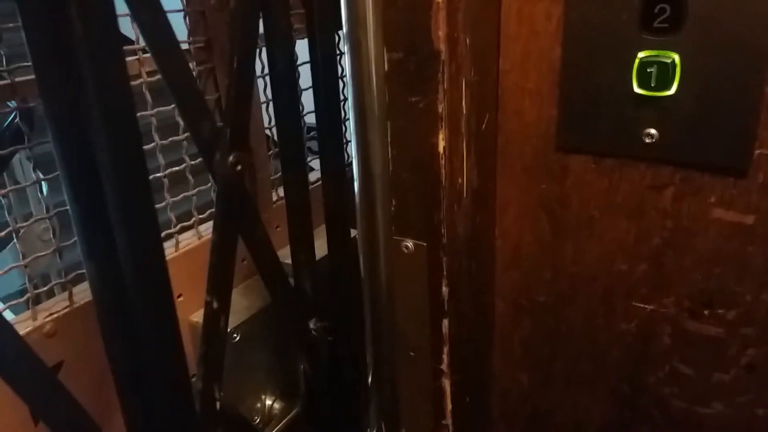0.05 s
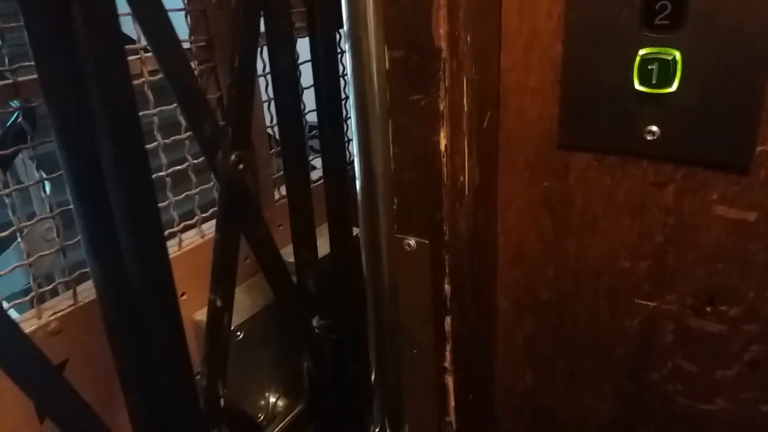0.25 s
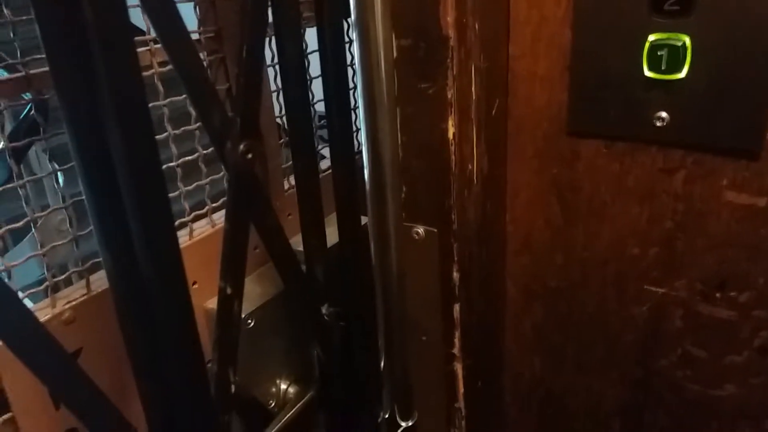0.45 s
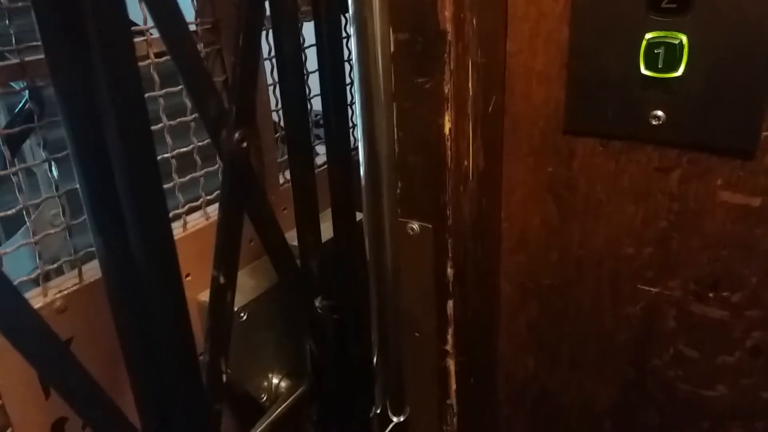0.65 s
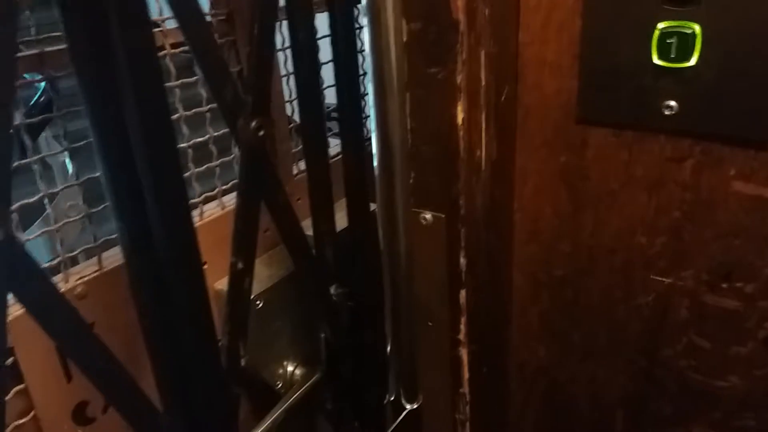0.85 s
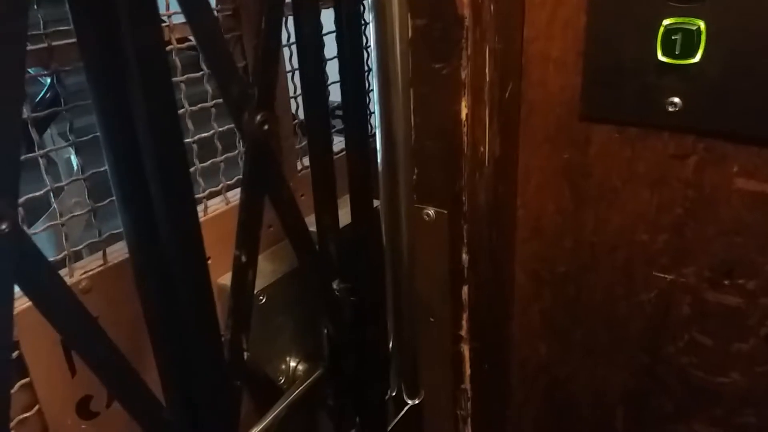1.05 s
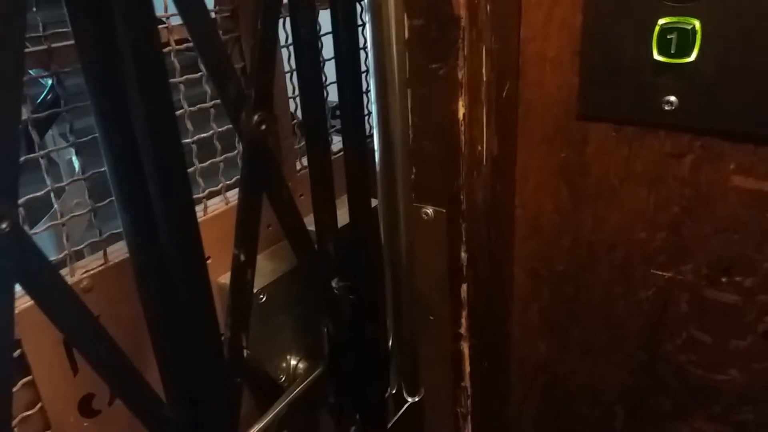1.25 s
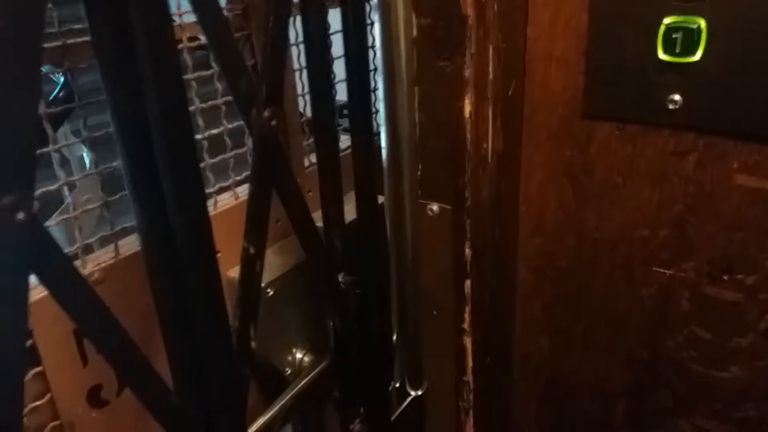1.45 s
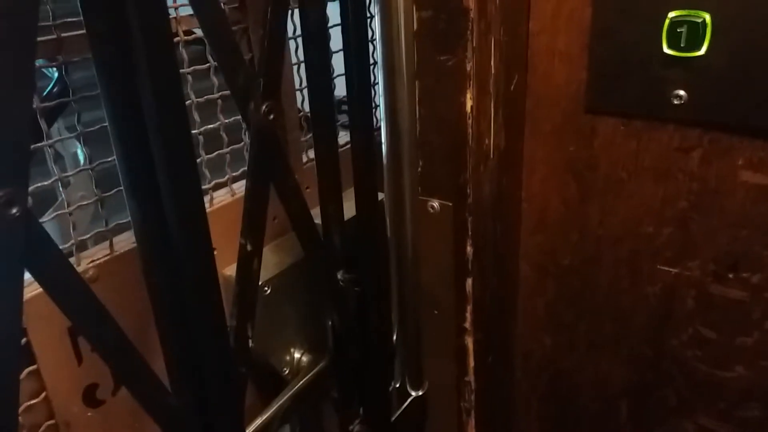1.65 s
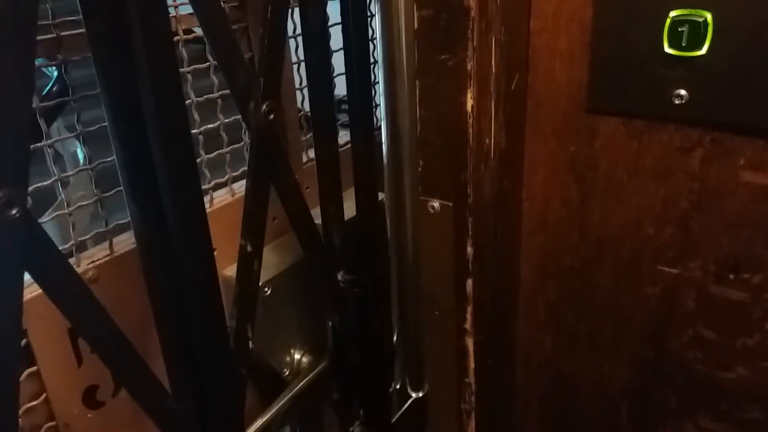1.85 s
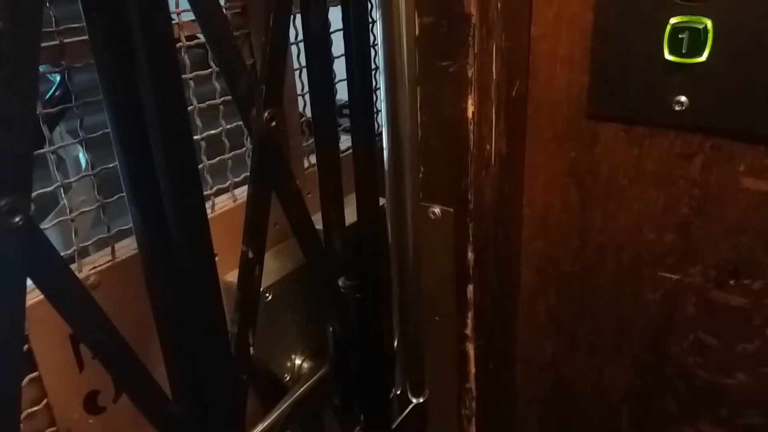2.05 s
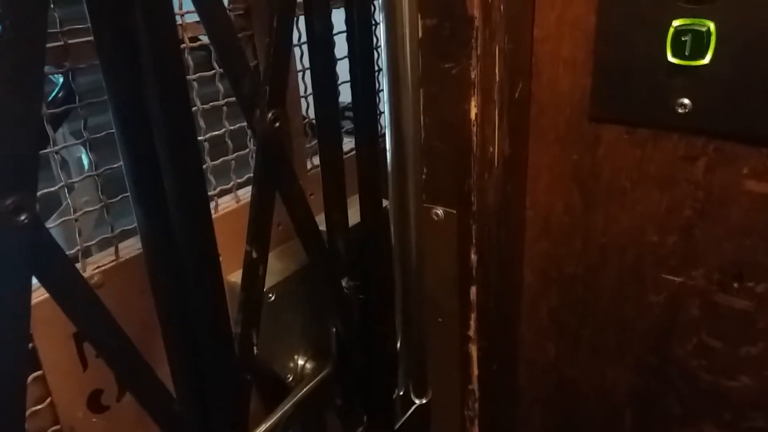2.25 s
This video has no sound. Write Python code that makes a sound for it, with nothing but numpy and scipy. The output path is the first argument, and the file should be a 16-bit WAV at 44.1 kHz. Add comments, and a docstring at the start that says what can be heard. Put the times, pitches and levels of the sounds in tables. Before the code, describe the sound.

A folding metal lift gate latches with a sharp clank that rings through the shaft.

```python
"""An old lift's folding steel gate latches, heard from inside the wooden car over a low, steady rumble.
The lever slides and knocks lightly, then at a quarter second the latch slams home: steel rings and
the gate bars clatter. The blow shakes the car's floor and panels, which shudder again a moment later.
The shaft rings on for about a second with a faint hiss behind it, and the settling gate ticks twice.
Two soft thuds in the car come near the end."""
import sys
import numpy as np
from scipy import signal
from scipy.fft import rfft, irfft
from scipy.io import wavfile

SR = 44100
rng = np.random.default_rng(int(sys.argv[2]) if len(sys.argv) > 2 else 0)


def unload_wav(signal):
    """Save mono or channel-first audio to the path in sys.argv[1] as 16-bit WAV at rate SR, clipped to [-1, 1]."""
    wavfile.write(
        sys.argv[1],
        SR,
        np.round(np.clip(np.atleast_2d(signal).T, -1, 1) * 32767).astype(np.int16),
    )


N = 105840  # 2.4 s


def latch():
    """Steel contacts feed energy into the latch's modes and the gate bars; slow contacts sound duller."""
    # the slam and its rattle: start_s, level_db, contact_s
    contacts = [(.2395, -38.5, 0.00094), (0.2435, -32.5, 0.0013), (0.2452, -27, 0.00057),
                (0.2486, -36, 0.0021), (0.2565, -47.5, 0.0038), (.277, -39.5, .005), (0.329, -38, 0.0068)]
    # ring of the latch: pitch_hz, level_db, t60_s
    latch_modes = [(500, -18, .18), (557, -12, .18), (630, -11, .2), (755, -14, .2), (860, -16, .18),
                   (1365, -4, .14), (1573, -13, .13), (1788, -15, .12), (1981, -15, .1), (2242, -3, .13),
                   (2385, -12, .1), (3458, -11, .08), (4330, -14, .05), (4980, -11, .06), (5425, -4, .07)]
    # dense clatter of the gate bars: freq_hz, density_db, t60_s
    clatter = [(60, -45, .15), (200, -11, .15), (430, -1, 0.2), (613, 4, 0.17), (740, 0, 0.069),
               (1070, -11.5, 0.084), (1470, -5.5, 0.096), (2680, -7, 0.15), (5750, -7, 0.088),
               (5970, -16, 0.059), (6900, -12.5, 0.12), (7860, -22.5, 0.097), (15800, -23.5, 0.024)]
    steel_db, bars_db = -4, -0.5
    contact_cycles = 19  # vibrations that fit more cycles than this into a contact get less energy
    t = np.arange(N) / SR
    contact_s = np.array(contacts)[:, 2]
    pushes = np.array([amp(db) ** 2 * at(start, np.diff(rise(length), prepend=0))
                       for start, db, length in contacts])

    def power(hz):
        """Power that all the contacts deliver at one frequency."""
        return 1 / (1 + (hz * contact_s / contact_cycles) ** 2) @ pushes

    steel = sum(amp(db) * np.sin(2 * np.pi * (hz * t + rng.random())) * ring_envelope(power(hz), t60)
                for hz, db, t60 in latch_modes)
    bars = sum(band * ring_envelope(power(hz), along(clatter, hz, column=2))
               for hz, band in bands(noise(clatter)))
    return amp(steel_db) * steel + amp(bars_db) * bars


def car_thuds():
    """Soft blows sway the car and build up in its floor, walls and wooden panels."""
    # blows that shake the car: start_s, sway_db, floor_db, wall_db, panel_db, build_s
    thuds = [(0.087, -54, -37, -71, -67, 0.028), (0.184, -74, -42.5, -43, -41, 0.0038),
             (0.215, -71, -33, -67, -48, 0.008), (.243, -31, -68, -35.5, -33, 0.0088),
             (.259, -40, -16.5, -36, -25, 0.015), (0.312, -28.5, -45, -58, -57, 0.022),
             (0.366, -38, -27.5, -39.5, -41.5, 0.022), (0.427, -39, -35, -39, -59, 0.027),
             (0.514, -49, -31, -45, -58, 0.021), (0.547, -50, -59, -50, -40.5, 0.017),
             (.572, -34.5, -51, -54, -56, 0.0049), (0.621, -42, -32.5, -41.5, -36.5, .018),
             (.665, -81, -50, -30.5, -41, 0.025), (0.714, -46, -34.5, -53, -45, 0.018),
             (0.772, -47, -34, -52.5, -54.5, .018), (0.862, -77, -45, -57, -69, 0.01),
             (2, -53.5, -57, -67, -63, 0.0078), (2.145, -55, -55, -58.5, -75, 0.0079)]
    # modes of the swaying car, its floor, its walls and its thin panels: pitch_hz, level_db, t60_s
    sway_modes = [(63.6, -6, 0.4)]
    floor_modes = [(82, 0, .1)]
    wall_modes = [(176, -5, .15), (191, 0, .15)]
    panel_modes = [(250, 0, .12), (305, -13, .11), (385, -15, .08), (436, -26, .18), (670, -24, .1)]
    car_db = 9
    parts = np.array([ring(modes) for modes in (sway_modes, floor_modes, wall_modes, panel_modes)])
    shudder = sum(at(start, rise(build) * (amp(parts_db) @ parts)) for start, *parts_db, build in thuds)
    return amp(car_db) * shudder


def lever():
    """The lever slides and knocks before the slam; each knock is a short tone in a band of noise."""
    # hiss of the slide: freq_hz, density_db
    slide_colour = [(80, -30), (300, 5), (600, 0), (1000, -3.5), (1450, 5.5), (1900, -5.5), (3200, -10.5),
                    (5800, -19.5), (8000, -28.5)]
    # light knocks: start_s, pitch_hz, level_db, t60_s
    knocks = [(0.1688, 1312, -48, 0.078), (.183, 666, -48.5, 0.48), (.193, 2430, -53.5, 0.06)]
    slide_start_s, slide_end_s, slide_fade_s, slide_db = 0.079, 0.2333, 0.011, -61
    knock_attack_s, tone_db = 0.00052, -3.5
    spread = np.exp(0.28)  # frequency ratio from a knock's pitch to where its noise is 12 dB down
    t = np.arange(N) / SR
    moving = np.clip(np.minimum(t - slide_start_s, slide_end_s - t) / slide_fade_s, 0, 1)
    out = amp(slide_db) * moving * noise(slide_colour)
    for start, hz, db, t60 in knocks:
        grit = noise([(hz / spread ** 6, -70), (hz / spread, -12), (hz, 0),
                      (hz * spread, -12), (hz * spread ** 6, -70)])
        knock = grit * fade(t60) + ring([(hz, tone_db, t60)])
        out = out + amp(db) * at(start, knock * rise(knock_attack_s))
    return out


def gate_ticks():
    """Tiny bright clicks of the gate settling."""
    # the clicks: start_s, level_db
    ticks = [(.858, -69), (1.259, -67.5)]
    # their bright spectrum: freq_hz, density_db
    tick_colour = [(2000, -12), (4500, 1), (7500, 3), (10000, -8), (15000, -6)]
    return sum(amp(db) * at(start, noise(tick_colour) * rise(seconds=.001) * fade(t60=.06))
               for start, db in ticks)


def shaft_echo(x):
    """The shaft stores each band's energy and gives it back as a diffuse wash; the mids ring longest."""
    # reverb of the shaft: freq_hz, gain_db, t60_s
    reverb = [(48, -30, 0.53), (119, -4, 0.61), (251, -11, 0.89), (342, 2, 1.4), (446, 2.5, 1.7),
              (557, -6.5, 1.95), (690, -4, 2.1), (1030, -3, 2.1), (1455, -8, 2.23), (1880, -9, 2.23),
              (2320, -8, 1.53), (2730, -8, 1.54), (3920, -9.5, 1.56), (4850, -12, 1.08), (5300, -12, 0.94),
              (6200, -11.5, 0.9), (9150, -13.5, 0.58), (15000, -15, 0.38)]
    predelay_s, build_s = 0.0066, 0.002
    washes = bands(rng.standard_normal(N), count=56)
    out = 0
    for (hz, band), (_, wash) in zip(bands(x, count=56), washes):
        decay_s = along(reverb, hz, column=2) / np.log(1e6)  # t60 to the energy's time constant
        energy = lag(lag(band ** 2, build_s), decay_s)
        out = out + amp(along(reverb, hz)) * np.sqrt(energy) * wash / wash.std()
    return at(predelay_s, out)


def lingering_hiss():
    """A faint high hiss that swells and fades behind the echo."""
    # spectrum of the hiss: freq_hz, density_db
    hiss_colour = [(500, -25), (2000, 6), (5000, 0), (8000, -7), (15000, -7)]
    # its swell and fade: time_s, level_db
    swell = [(.1, -97), (.4, -74), (.83, -75), (1.35, -81), (1.7, -89)]
    level_db = np.interp(np.arange(N) / SR, *np.transpose(swell))
    return noise(hiss_colour) * amp(level_db)


def building_rumble():
    """Steady building noise booms in the car's resonances under a smooth hiss."""
    # rumble and air of the building: freq_hz, density_db
    rumble_colour = [(15, -103), (25, -44), (46, -9), (75, -2.5), (107, -2.5), (140, -21.5), (169, -3.5),
                     (188, -1), (209, -10), (233, -11.5), (313, -10.5), (340, -24.5), (410, -9), (482, -23),
                     (2560, -30), (8130, -45), (15500, -39)]
    return amp(db=-59.5) * noise(rumble_colour)


def amp(db):
    """Decibels to gain."""
    return 10 ** (np.asarray(db) / 20)


def along(points, hz, column=1):
    """Read a table's column on a log-frequency axis."""
    points = np.array(points, float)
    return np.interp(np.log(np.maximum(hz, 1)), np.log(points[:, 0]), points[:, column])


def noise(colour):
    """Noise of rms 1 with the given spectral shape."""
    gain = amp(along(colour, np.fft.rfftfreq(N, 1 / SR)))
    x = irfft(rfft(rng.standard_normal(N)) * gain, N)
    return x / x.std()


def bands(x, count=28):
    """Split a sound into overlapping bands that sum to it: (centre_hz, band) pairs."""
    centres = np.geomspace(40, SR / 2, count)
    hz, spectrum = np.fft.rfftfreq(N, 1 / SR), rfft(x)
    return [(centre, irfft(spectrum * np.interp(hz, centres, weights), N))
            for centre, weights in zip(centres, np.eye(count))]


def fade(t60):
    """Exponential decay by 60 dB in t60 seconds."""
    return np.exp(-np.log(1000) * np.arange(N) / SR / max(t60, 1e-3))


def rise(seconds):
    """Smooth build-up from 0 to 1."""
    return 1 - np.exp(-(np.arange(N) / SR / seconds) ** 2)


def at(start, x):
    """Delay a sound to its starting time."""
    return np.concatenate([np.zeros(max(int(start * SR), 0)), x])[:N]


def ring(modes):
    """Decaying sines of a struck object."""
    t = np.arange(N) / SR
    return sum(amp(db) * np.sin(2 * np.pi * hz * t) * fade(t60) for hz, db, t60 in modes)


def ring_envelope(power, t60):
    """Amplitude of a resonance that gathers energy and loses 60 dB in t60 seconds."""
    keep = np.exp(-np.log(1e6) / (max(t60, 1e-3) * SR))
    return np.sqrt(signal.lfilter([1], [1, -keep], power))


def lag(x, seconds):
    """One-pole smoothing with the given time constant."""
    keep = np.exp(-1 / (seconds * SR))
    return signal.lfilter([1 - keep], [1, -keep], x)


def scene():
    """Gate and car sound close by and echo in the shaft, over the rumble and hiss, in mono."""
    near = latch() + car_thuds() + lever() + gate_ticks()
    return (near + shaft_echo(near) + building_rumble() + lingering_hiss())[None]


def record(dry):
    """The microphone loses the deepest bass, and the top is cut steeply."""
    low_cut_hz, high_cut_hz = 44, 15800
    thinned = signal.sosfilt(signal.butter(4, low_cut_hz, "high", fs=SR, output="sos"), dry)
    return signal.sosfilt(signal.ellip(10, .2, 70, high_cut_hz, fs=SR, output="sos"), thinned)


dry = scene()
out = record(dry)
unload_wav(out)
```